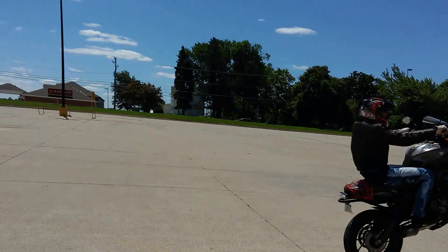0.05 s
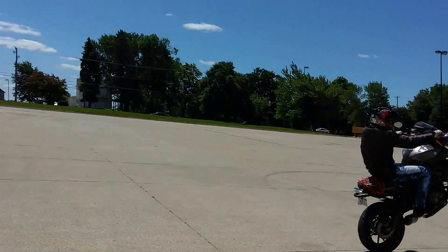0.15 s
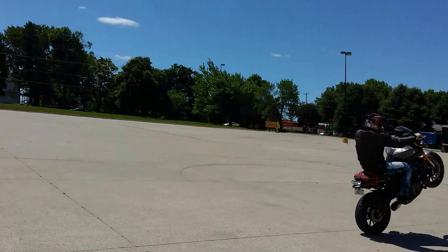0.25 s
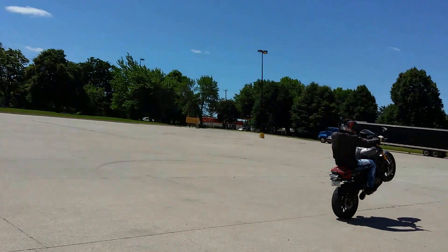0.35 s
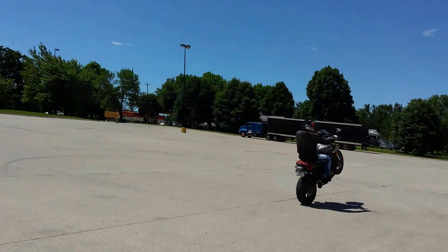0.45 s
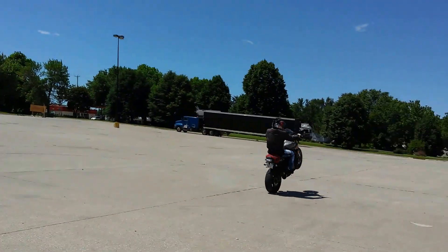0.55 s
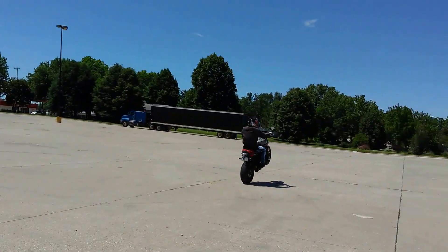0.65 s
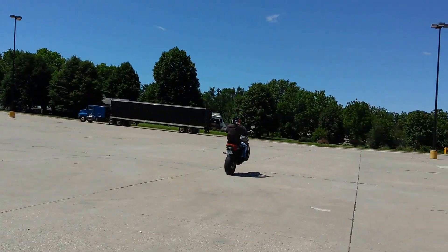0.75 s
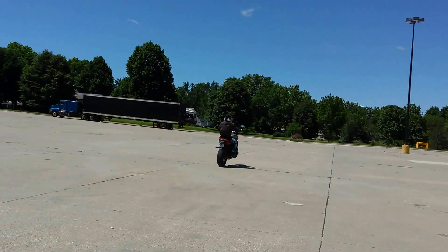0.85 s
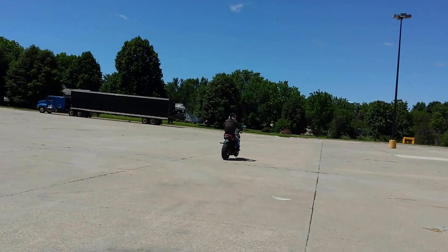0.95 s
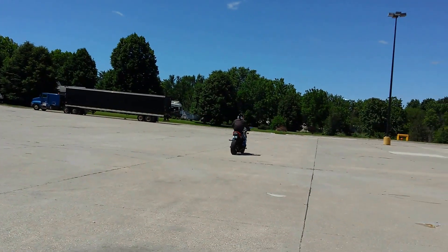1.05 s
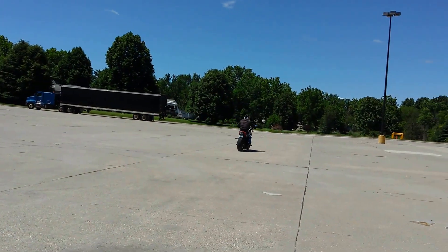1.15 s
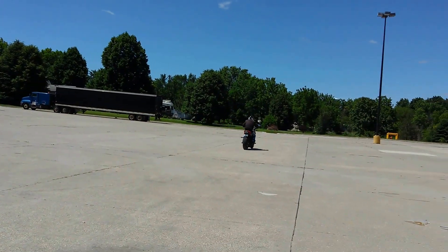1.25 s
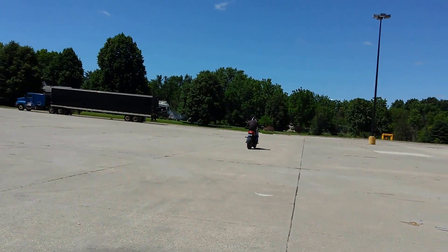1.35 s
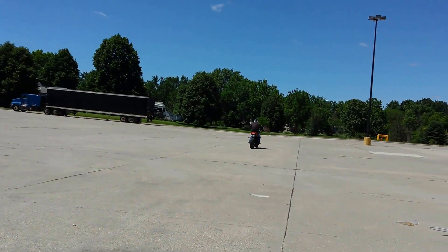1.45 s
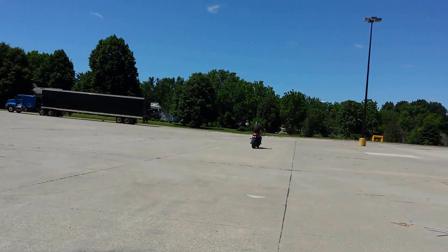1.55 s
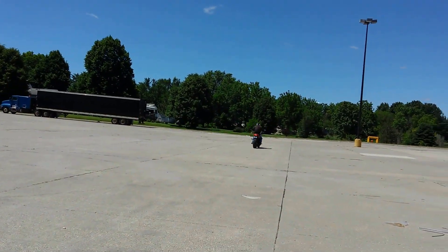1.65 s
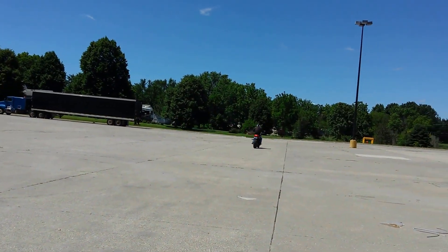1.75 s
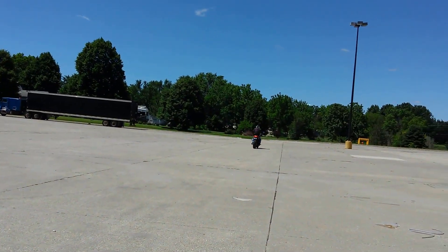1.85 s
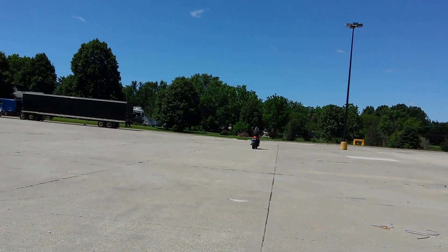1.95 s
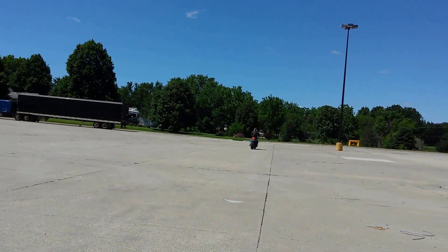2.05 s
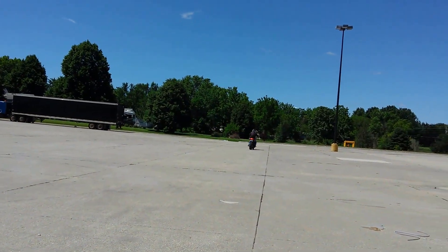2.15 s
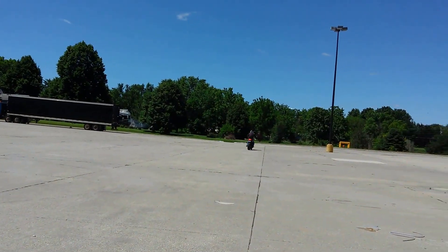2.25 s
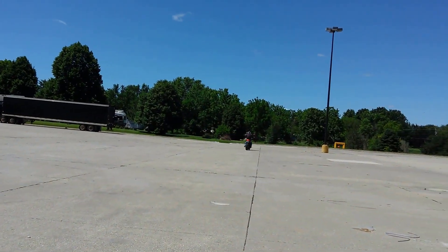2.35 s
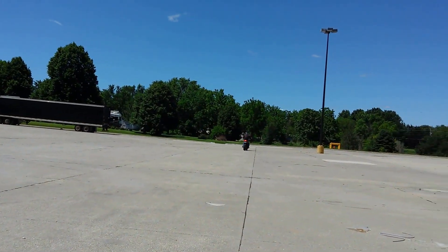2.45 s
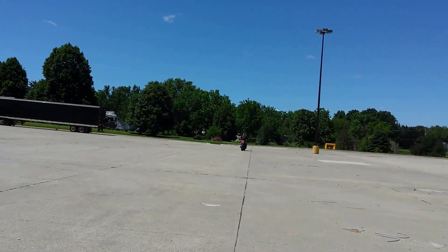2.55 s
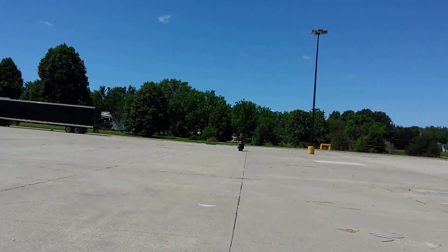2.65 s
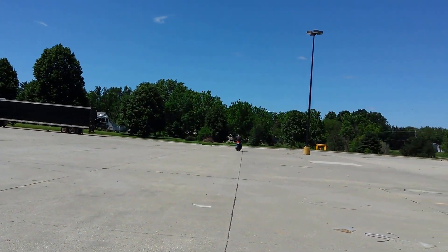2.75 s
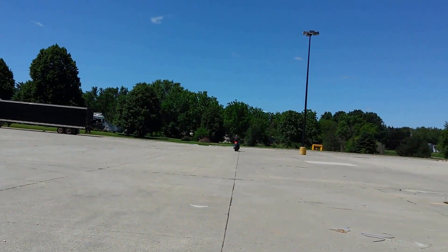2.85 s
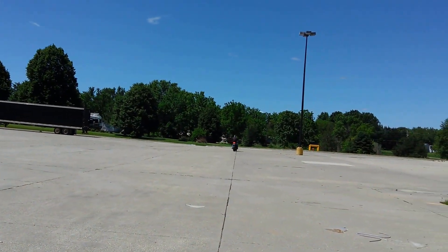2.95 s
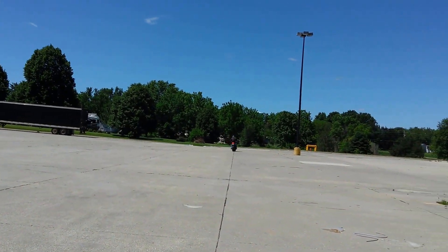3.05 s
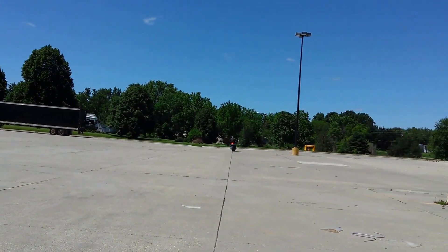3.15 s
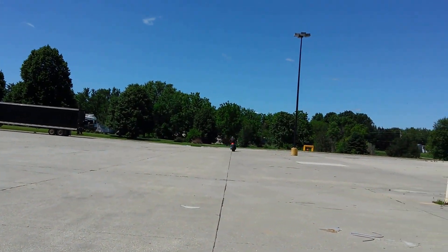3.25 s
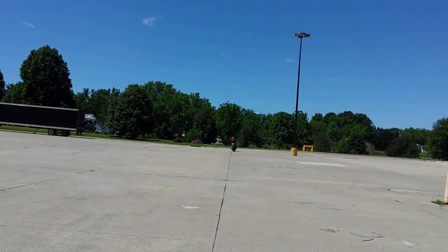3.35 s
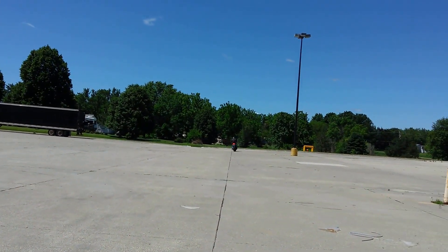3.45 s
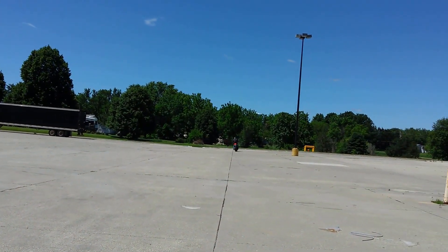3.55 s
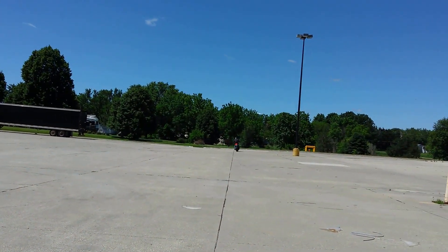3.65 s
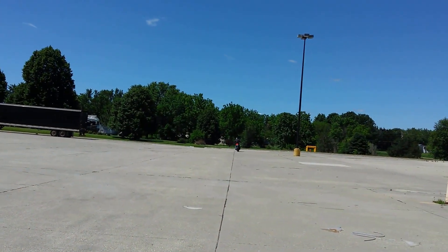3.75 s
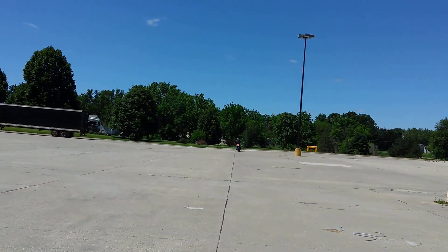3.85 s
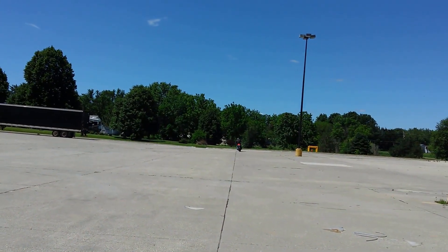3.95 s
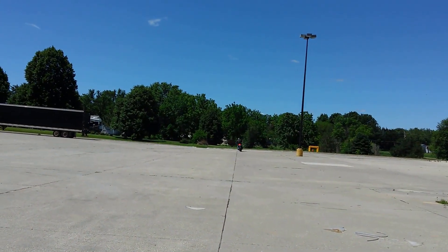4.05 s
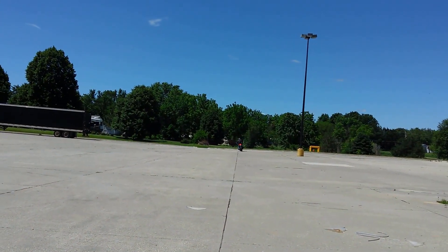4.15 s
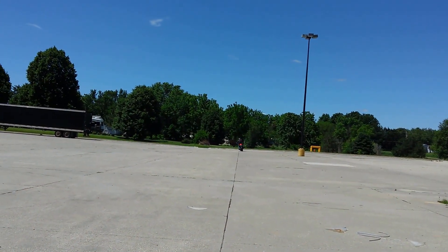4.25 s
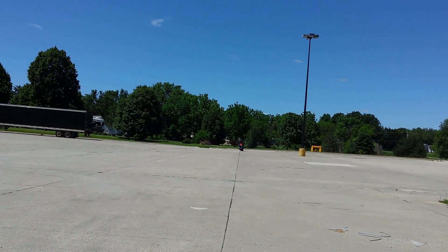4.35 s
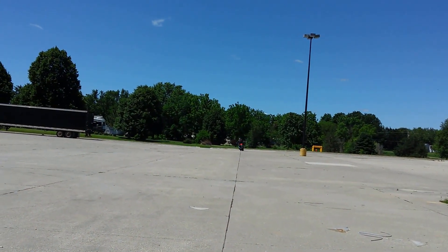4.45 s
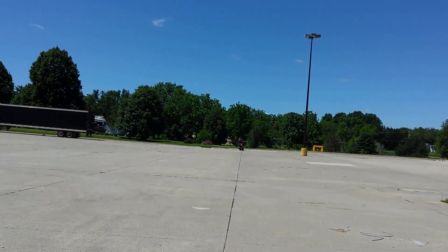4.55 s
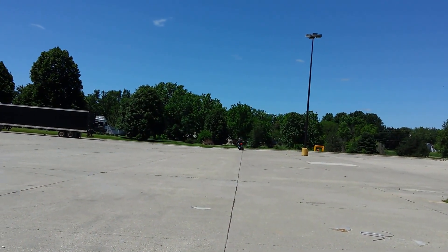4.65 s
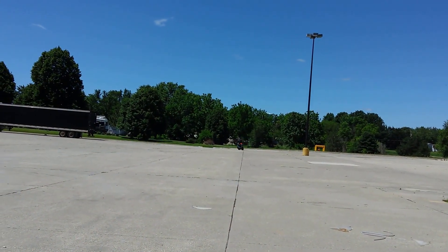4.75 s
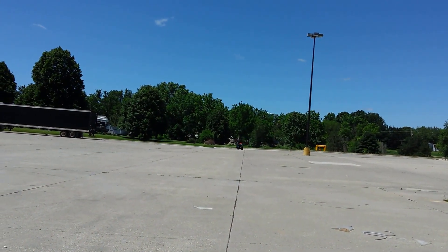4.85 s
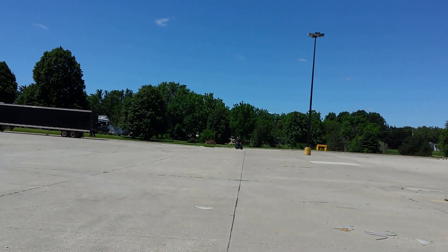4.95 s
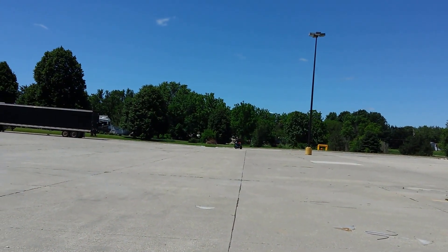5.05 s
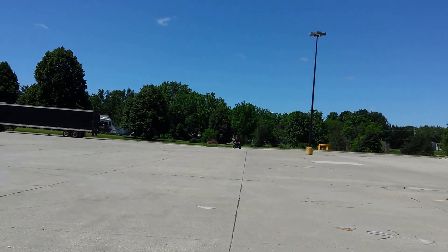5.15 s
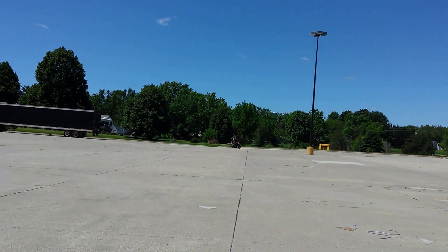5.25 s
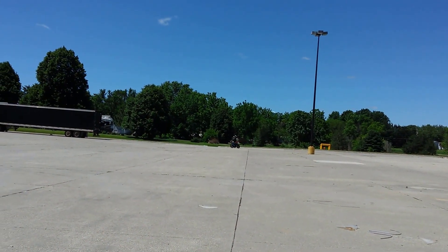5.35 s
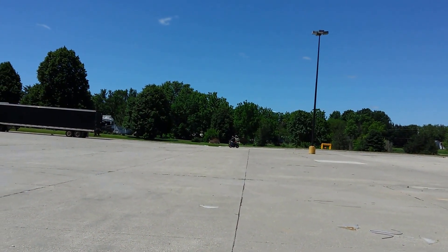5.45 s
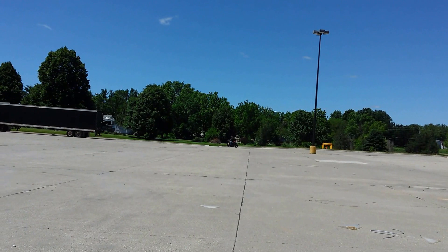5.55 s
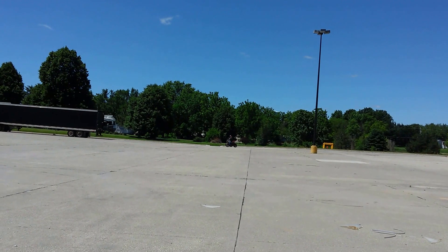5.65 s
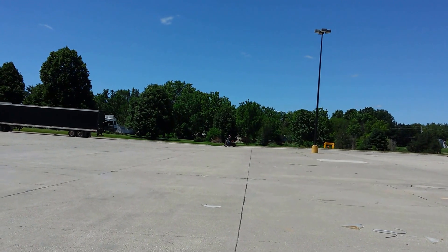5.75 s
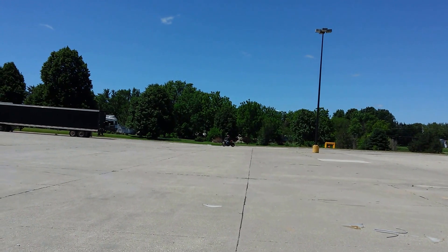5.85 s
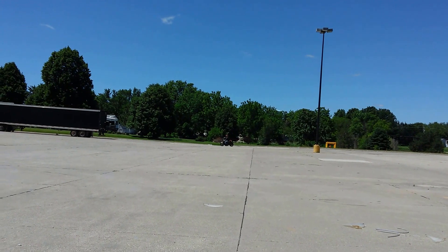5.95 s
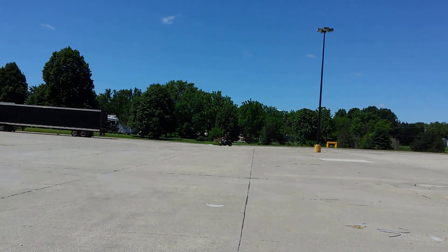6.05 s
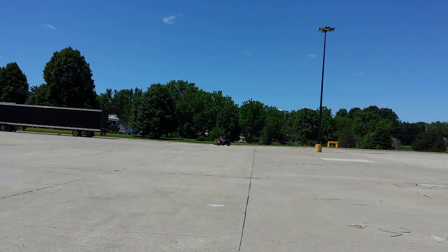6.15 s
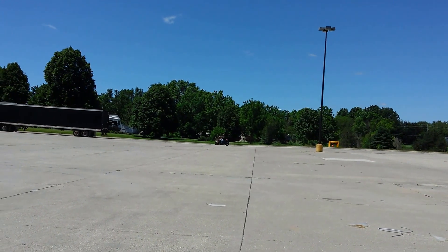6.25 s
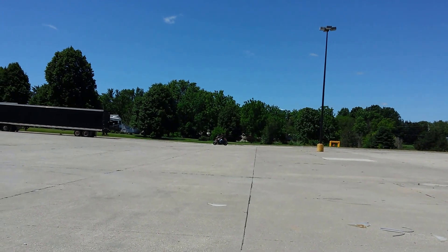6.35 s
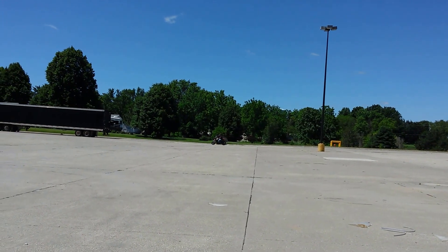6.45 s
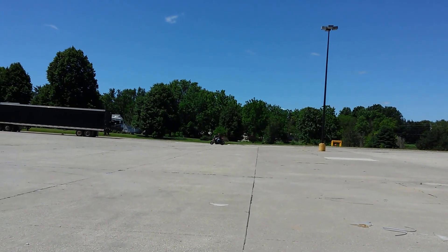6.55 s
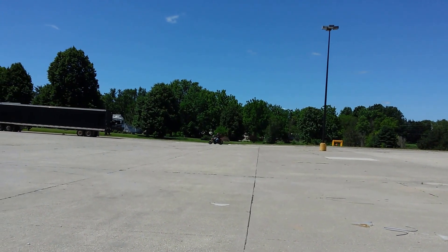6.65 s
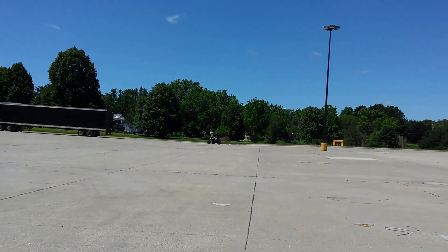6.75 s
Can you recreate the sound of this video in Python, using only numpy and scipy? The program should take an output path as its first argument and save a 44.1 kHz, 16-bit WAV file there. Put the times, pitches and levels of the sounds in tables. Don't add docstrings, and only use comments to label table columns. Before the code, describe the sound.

A motorcycle howls away close by across an open lot, snaps off the throttle, coasts down with popping overrun, and idles unevenly far off.

```python
import sys
import numpy as np
from scipy import signal
from scipy.fft import rfft, irfft, next_fast_len
from scipy.io import wavfile
from scipy.ndimage import uniform_filter1d, map_coordinates

SR = 44100
rng = np.random.default_rng(int(sys.argv[2]) if len(sys.argv) > 2 else 0)


def int16_out(signal):
    q = np.round(np.clip(np.atleast_2d(signal).T, -1, 1) * 32767)
    wavfile.write(sys.argv[1], SR, q.astype(np.int16))


def rack_gain(trim_db):
    fader = np.asarray(trim_db, float)
    return 10 ** (fader / 20)


N = 299880
T = np.arange(N) / SR
SHUT_S, CLUTCH_S = 1.4, 3.01

# time in seconds, firing rate in Hz, fundamental in dB, second overtone (twice the
# firing rate) in dB.
ENGINE = [(0, 146.6, -16.5, -12.5), (.43, 146.6, -21, -15.5), (.83, 157.1, -14.5, -17),
          (1.06, 162.5, -17, -18.5), (1.19, 166.5, -12, -19.5), (1.33, 174.3, -22, -22.5),
          (1.38, 173.1, -13, -33.5), (1.46, 160.7, -9.5, -21.5), (1.82, 159.8, -12, -26),
          (1.99, 151.8, -11.5, -27.5), (2.24, 130.4, -13.5, -27), (2.36, 133.7, -11.5, -30),
          (2.72, 114.1, -13.5, -27.5), (3.01, 101.2, -15, -26), (3.5, 86.6, -17.5, -33.5),
          (4.02, 69.04, -23.5, -38), (4.28, 57.2, -38, -40), (4.6, 52.77, -39, -36)]
# time in seconds, peak in dB, crack in dB.
POPS = [(3.184, -14.5, -23), (3.256, -14, -6), (3.274, -14, -17), (3.328, -13, -19), (3.353, -14, -21),
        (3.387, -13.5, -24), (3.41, -20, -22), (3.44, -25.5, -11.5), (3.489, -14, -16), (3.549, -12.5, -25),
        (3.58, -15.5, -18), (3.639, -15.5, -23), (3.677, -26.5, -12), (3.756, -20.5, -13),
        (3.813, -36, -18), (3.879, -14, -27), (4.173, -16, -22), (4.236, -15, -17), (4.287, -21.5, -17),
        (4.386, -17, -17.5), (4.527, -22, -31), (4.676, -18.5, -33), (4.716, -19, -21), (4.754, -17, -17),
        (4.981, -19, -27), (5.082, -20.5, -22), (5.171, -21.5, -13), (5.281, -22, -22), (5.308, -20.5, -15),
        (5.496, -20.5, -19)]


def unit(x):
    return x / np.sqrt(np.mean(x ** 2) + 1e-20)


def along(points, hz):
    f, v = np.transpose(points)
    return np.interp(np.log(hz + 1), np.log(f + 1), v)


def curves(rows):
    s, *cols = np.transpose(rows)
    return [np.interp(T, s, c) for c in cols]


def bumps(rows):
    return sum(db * np.exp(-((T - s) / width) ** 2) for s, width, db in rows)


def wobble(rate):
    knots = rng.standard_normal(int(N * rate / SR) + 4)
    return map_coordinates(knots, [T * rate], order=1)


def phase(opened, shut, slack):
    turns = [SHUT_S - .02, SHUT_S + 0.015, CLUTCH_S - .1, CLUTCH_S + 0.11]
    return np.interp(T, turns, [opened, shut, shut, slack])


def filtered(x, response):
    m = next_fast_len(N + SR // 2)
    return irfft(rfft(x, m) * response(np.fft.rfftfreq(m, 1 / SR)), m)[..., :N]


def resonance(f, hz, width_hz):
    return 1j * f * width_hz / (hz * hz - f * f + 1j * f * width_hz)


def kicks(times, db):
    return np.bincount(np.round(np.asarray(times) * SR).astype(int), rack_gain(db), N)[:N]


def rush(spectrum, patchy_db):
    # frequency in Hz, correlation of left and right.
    coherence = [(30, .9), (70, .98), (400, .95), (950, .85), (2400, .66), (6000, .48), (15000, .3)]
    z = signal.stft(rng.standard_normal((2, N)), nperseg=512)[2]
    field = uniform_filter1d(rng.standard_normal(z.shape[1:]), size=5, axis=0)
    field = uniform_filter1d(field, size=12, axis=1)
    pair = signal.istft(z * rack_gain(patchy_db * unit(field)), nperseg=512)[1][:, :N]

    def shares(hz):
        turn = np.arccos(np.clip(along(coherence, hz), -1, 1)) / 2
        return rack_gain(along(spectrum, hz)) * [np.cos(turn), np.sin(turn)]

    mid, side = filtered(pair, shares)
    return unit(np.array([mid + side, mid - side]))


def far_air():
    # frequency in Hz, level in dB.
    air = [(200, -30), (400, -21), (800, -36), (1150, -6.5), (1450, -18), (1900, -22.5), (3900, -23),
           (6000, -33.5), (8000, -41), (9000, -51), (10300, -38.5), (13000, -36), (15700, -31)]
    return rack_gain(-59.5) * rush(air, patchy_db=0.5)


def breeze():
    # frequency in Hz, level in dB per Hz.
    buffeting = [(15, -18), (35, -3), (60, 0), (110, -15.5), (200, -63)]
    # time in seconds, half width in seconds, rise in dB.
    swells = [
        (4.15, .25, 7),
        (4.8, 1.2, 12),
    ]
    puffs = filtered(rng.standard_normal((2, N)), lambda hz: rack_gain(along(buffeting, hz)))
    return rack_gain(-63 + 3 * wobble(1.6) + bumps(swells)) * unit(puffs)


def echoes(x):
    # frequency in Hz, 60 dB decay time in seconds.
    lot = [(100, 1), (500, 0.22), (3000, 0.16)]
    hz, t, z = signal.stft(rng.standard_normal((2, SR // 2)), SR, nperseg=256)
    decay = rack_gain(-60 * t / along(lot, hz)[:, None])
    tail = signal.istft(z * decay, SR, nperseg=256)[1]
    tail[1] = 0.85 * tail[0] + 0.3 * tail[1]
    late = np.pad(x, (500, 0))[None]
    return signal.fftconvolve(late, tail / np.linalg.norm(tail[0]), axes=1)[:, :N]


def bird():
    # start in seconds, length in seconds, top pitch in Hz, level in dB.
    trills = [
        (3.604, .145, 4750, -50),
        (4.82, .2, 4600, -55.5),
        (5.0, .11, 3500, -61),
        (6.47, .11, 4300, -58),
        (6.59, .15, 3400, -58),
    ]
    song = np.zeros(N)
    for s, length, top_hz, db in trills:
        t = np.arange(int(length * SR)) / SR
        count, beat = np.divmod(t * 83, 1)
        pitch, size = rng.standard_normal((2, 30))[:, count.astype(int)]
        hz = top_hz * (1 + .04 * pitch - 3.2 * (beat - .45) ** 2)
        whole = np.sin(np.pi * t / length) ** .35
        each = np.sin(np.pi * np.clip((beat - .15) / .6, 0, 1)) ** .45
        whistle = np.sin(2 * np.pi * np.cumsum(hz) / SR)
        song[int(s * SR):][:len(t)] = rack_gain(db + 1.9 * size) * whole * each * whistle
    return song


def clicks():
    # time in seconds, level in dB, frequency in Hz.
    ticks = [
        (3.256, -32, 1800),
        (3.325, -43, 1510),
        (3.44, -28, 800),
        (3.58, -41, 11000),
        (4.925, -45, 9002),
        (5.392, -54, 10900),
        (6.485, -54, 11000),
    ]
    total = np.zeros(N)
    for s, db, hz in ticks:
        total += filtered(kicks([s], [db + 9]), lambda f: resonance(f, hz, 1.2 * hz))
    return total


def noise_levels():
    # time in seconds, effort in dB, distance in metres.
    ride = [(0, -31, 4.3), (.2, -36, 1.9), (.4, -39, 7.8), (.65, -38, 21.6), (1.15, -36.5, 25.8),
            (1.33, -38, 19), (1.45, -41.5, 18), (1.53, -37, 23), (1.6, -39.5, 26), (2.07, -38, 40),
            (2.5, -38.5, 38.3), (2.97, -43, 42.7), (3.3, -45.5, 65), (3.7, -48.5, 47), (4.2, -53.5, 53),
            (4.8, -57.5, 96), (5.85, -55.5, 125), (6.8, -57, 64)]
    # time in seconds, half width in seconds, rise of clatter and hiss in dB.
    scrapes = [
        (2.47, 0.061, 1),
        (3.6, 0.024, 3.5),
        (3.82, 0.055, 3),
        (6.5, 0.15, 7),
    ]
    roar_db, distance = curves(ride)
    chain_db = phase(0, 3.5, 0)
    clatter_db = roar_db - 4 - 0.15 * distance + chain_db + bumps(scrapes)
    hiss_db = roar_db + 1 - 0.34 * distance + bumps(scrapes)
    return roar_db, clatter_db, hiss_db


def machine(cycle):
    # frequency in Hz, level in dB per Hz.
    rumble = [(20, -37), (40, -24), (75, -5.5), (170, 7), (250, -6), (450, -15.5), (900, -28.5),
              (1400, -49.5), (2000, -65)]
    # frequency in Hz, level in dB.
    roar = [(530, -5), (900, 1.5), (931, -16), (995, -2.5), (1300, -2.5), (1450, -8), (1740, -1.5),
            (1990, -3.5), (2230, -7), (2550, -8.5), (3400, -15), (4420, -49), (7480, -120)]
    clatter = [(1530, -40.5), (2600, -4.5), (2770, -2.5), (3230, 0.5), (3530, -4.5), (3890, 4.5),
               (4120, -2), (4270, -1.5), (4630, 1), (5000, -2.5), (5620, -5), (6130, -4.5), (7000, -8),
               (9100, -26), (15400, -120)]
    hiss = [(4500, -15.5), (5600, -8), (6100, -6), (6900, -5), (8000, -2), (8800, -5.5), (10100, -4),
            (10900, -11), (11500, -21), (13000, -33)]
    sizzle = [(10000, -25), (11300, 3.5), (12000, 0), (14000, -3.5), (15700, -9.5)]
    roar_db, clatter_db, hiss_db = noise_levels()
    sinking_db = 7 * np.clip(T - 3.58, 0, None)
    body_db = np.maximum(phase(-45, -35.5, -33.5) - sinking_db, -46)
    gate = 1 + phase(.3, .15, .15) * np.cos(3 * cycle)
    surge = wobble(9)
    top_db = hiss_db - 3.5 - 2.5 * T
    return (rack_gain(body_db + 8) * rush(rumble, patchy_db=2.5)
            + gate * rack_gain(roar_db + surge + 0.08) * rush(roar, patchy_db=1.0)
            + gate * rack_gain(clatter_db + surge + 0.25) * rush(clatter, patchy_db=1.5)
            + gate * rack_gain(hiss_db + surge + 2.0) * rush(hiss, patchy_db=1.5)
            + gate * rack_gain(top_db + surge) * rush(sizzle, patchy_db=1))


def burble():
    miss_share = .2
    s = np.arange(4.0, 5.45, .026)
    late, size, crack, luck = rng.uniform(-1, 1, (len(s), 4)).T
    s = s + .006 * late
    free = np.abs(s[:, None] - np.transpose(POPS)[0]).min(axis=1) > .016
    rows = np.transpose([s, -26 + 3 * size, -29 + 4 * crack])
    return rows[free & (luck > 2 * miss_share - 1)]


def beats_of_idle():
    # time in seconds, count of firings so far.
    idle_count = [(5.546, 0), (5.754, 8), (5.84, 11), (6.155, 22), (6.274, 26), (6.432, 32), (6.552, 36),
                  (6.788, 44)]
    # time in seconds, firing strength in dB, sag in dB per second.
    catches = [
        (5.53, -20, 200),
        (5.61, -22, 250),
        (5.69, -16.5, 146),
        (5.85, -19, 150),
        (5.94, -20, 66),
        (6.14, -16.5, 200),
        (6.26, -19.5, 3.5),
        (6.65, -17, 48),
    ]
    when, count = np.transpose(idle_count)
    idle = np.interp(np.arange(count[-1] + 1), count, when) - .0006
    caught, strength_db, sag = np.transpose(catches)
    since = idle[:, None] - caught
    db = np.where(since > 0, strength_db - sag * since, -60).max(axis=1)
    return idle, db + rng.normal(0, 2, len(idle))


def firings():
    # frequency in Hz, bandwidth in Hz, level in dB.
    pipe = [
        (76.7, 6.3, -10.5),
        (184.2, 24, -9),
        (357.4, 40.6, -14),
    ]
    s, db, crack_db = np.vstack([POPS, burble()]).T
    idle, idle_db = beats_of_idle()
    t = np.arange(-300, 3000) / SR
    thump = np.exp(-.5 * ((t - .0013) / .0022) ** 2) * np.sin(2 * np.pi * 170 * (t - .0013))
    for hz, width_hz, ring_db in pipe:
        envelope = np.clip(t / 0.0063, 0, 1) * np.exp(-np.pi * width_hz * t)
        thump += rack_gain(ring_db) * envelope * np.cos(2 * np.pi * hz * (t - .003))
    blows = kicks(s, db + 1) + kicks(idle, idle_db + 1)
    cracks = filtered(kicks(s - .001, db + crack_db + 31),
                      lambda f: resonance(f, 680, 600) ** 2 / (1 + (f / 3200) ** 4))
    return signal.fftconvolve(blows, thump)[300:][:N] - cracks


def shaft(rate):
    t = np.clip(T - 1.075, 0, None)
    slip = np.exp(-t / 0.074) * 0.0434 * np.sin(2 * np.pi * t / .095)
    slip = slip - 0.01162 * (t > 0) * (t < .2)
    return 2 * np.pi * np.cumsum(rate * (1 + slip) / 3) / SR


def boom(hz):
    return 18.5 * np.exp(-(np.log(hz / 335) / .13) ** 2) * phase(0, 0.94, 0.98)


def overtones(rate, first_db, upper_db):
    # time in seconds, half width in seconds, depth in dB.
    beats = [
        (1.378, 0.012, 43),
        (1.55, 0.017, 3),
        (2.48, 0.033, 8),
        (2.651, 0.028, 16),
        (2.79, .04, 8.5),
        (3.089, 0.043, 15),
        (3.39, .05, 29),
        (3.7, 0.063, 27),
        (4.11, .05, 17),
    ]
    lost_db = bumps(beats)
    flutter_db = phase(.7, 2.6, 3.9)
    second_db = upper_db + 0.32 * lost_db + flutter_db * wobble(18)
    third_db = noise_levels()[0] + phase(10.5, -3, 4.5) - 14 * np.exp(-T / 0.092)
    third_db = third_db + boom(3 * rate) + 1.5 * flutter_db * wobble(20)
    return first_db - lost_db, second_db, third_db


def ground_dip():
    climb = 1 - np.exp(-(np.clip(T - .17, 0, None) / .3) ** 2)
    drift = np.clip((T - 1.9) / .5, 0, 1)
    return np.where(T < SHUT_S, 700 + 800 * climb, 611 + 202 * drift)


def gears(cycle, rough_db):
    # time in seconds, half width in seconds, rise in dB.
    whines = [
        (.03, .07, 11),
        (.27, .07, 11),
        (.72, .18, 9),
        (2.5, .06, 12),
        (3.0, .25, 12),
    ]
    whine_db = noise_levels()[2] + phase(-23, -20, -20) + bumps(whines)
    whine = np.zeros(N)
    for order, db in ((97.0, 0.5), (94.0, 8), (92.7, -9)):
        angle = order * cycle + 2.2 * rough_db * wobble(70)
        whine += rack_gain(whine_db + db - 2 + 5 * wobble(18)) * np.cos(angle)
    return whine


def note(cycle, overtones_db):
    # multiple of the cycle rate (three firings each), level in dB.
    orders = [(1, -85), (2, -25.5), (3, 0), (4, -15.5), (5, -28), (6, -2), (7, -23), (8, -26.5), (9, -9),
              (10, -27.5), (11, -25.5), (12, -13), (13, -26.5), (14, -24.5), (15, -14.5), (16, -26.5),
              (17, -31), (18, -19), (19, -37), (20, -28.5), (21, -22.5), (22, -39), (23, -28.5), (24, -38),
              (25, -45), (26, -45), (27, -35.5), (30, -31.5), (33, -39), (36, -45.5), (39, -35)]
    roar_db = noise_levels()[0]
    rasp_db = roar_db + phase(4, -2, -2) - 9 * np.clip(T - 1.9, 0, .5)
    uneven_db = roar_db + phase(10, 7.5, -2.5)
    dip_hz = ground_dip()
    rough_db = 1.0 + .3 * T
    speed = np.gradient(cycle) * SR / (2 * np.pi)
    tone = np.zeros(N)
    for order, db in orders:
        if order in (3, 6, 9):
            level_db = overtones_db[order // 3 - 1]
        else:
            dip_db = 14 * np.exp(-(np.log(order * speed / dip_hz) / 0.17) ** 2)
            if order > 9:
                source_db = rasp_db + .5 * boom(order * speed) + 3 * (order % 3 > 0)
            else:
                source_db = uneven_db + 0.5
            level_db = db + 15 + source_db - dip_db
        if order < 3:
            level_db = level_db - 8 * (T > 1.42)
        if order > 27:
            level_db = level_db + phase(0, -12, -12)
        start = rng.uniform(0, 2 * np.pi) if order % 3 else 1.0
        depth = .7 if order == 3 else 1 + min(order, 15) * phase(.06, .1, .1)
        waver_db = rough_db * depth * wobble(30)
        angle = order * cycle + start + .025 * order * rough_db * wobble(25)
        tone += np.sqrt(2) * rack_gain(level_db + waver_db) * np.cos(angle)
    fade = np.clip((ENGINE[-1][0] - T) / 0.033, 0, 1)
    return (tone + gears(cycle, rough_db)) * fade


def scene():
    rate, first_db, upper_db = curves(ENGINE)
    cycle = shaft(rate)
    tone = note(cycle, overtones(rate, first_db, upper_db))
    thumps = firings() + clicks()
    song = bird()
    far = rack_gain(-26) * echoes(tone) + rack_gain(-17) * echoes(thumps) + rack_gain(-6) * echoes(song)
    distant = song + np.array([thumps, np.roll(thumps, 9)])
    return tone + distant + far + machine(cycle) + far_air() + breeze()


def roll_off(x):
    return signal.sosfilt(signal.butter(12, 15600, fs=SR, output="sos"), x)


def record(dry):
    # frequency in Hz, left minus right in dB.
    tilt = [(40, .8), (100, 1.2), (180, 1.5), (350, 2.3), (700, 1.8), (1400, -.3), (2500, 0), (3500, 3),
            (5500, 6), (8000, -1), (10000, -3.5), (15000, -2.5)]
    # frequency in Hz, phase by which left leads in radians.
    lead = [(100, -.02), (400, -.1), (1460, -.5), (1810, 0), (3270, -.6), (3880, -.1), (5170, -2.3),
            (6370, -1.2), (9130, -2.4), (10700, -1.5), (12300, -2.2), (14000, -.7)]

    def response(hz):
        port = rack_gain(along(tilt, hz) / 2) * np.exp(.5j * along(lead, hz))
        return np.array([port, 1 / port]) * (hz < 15760)

    return roll_off(filtered(dry, response))


dry = scene()
out = record(dry)
int16_out(out)
```